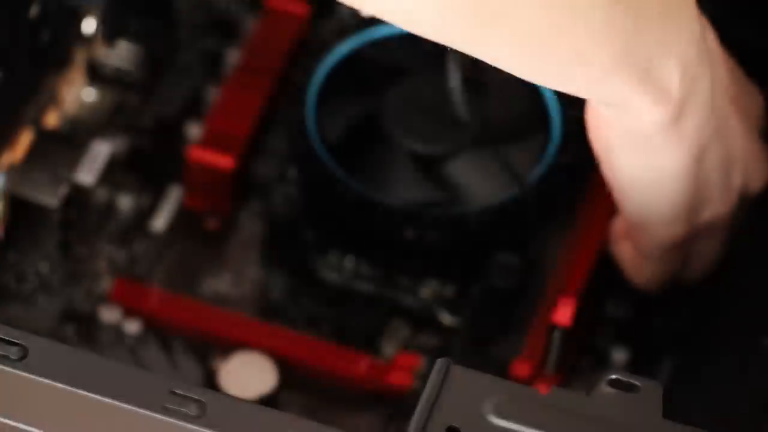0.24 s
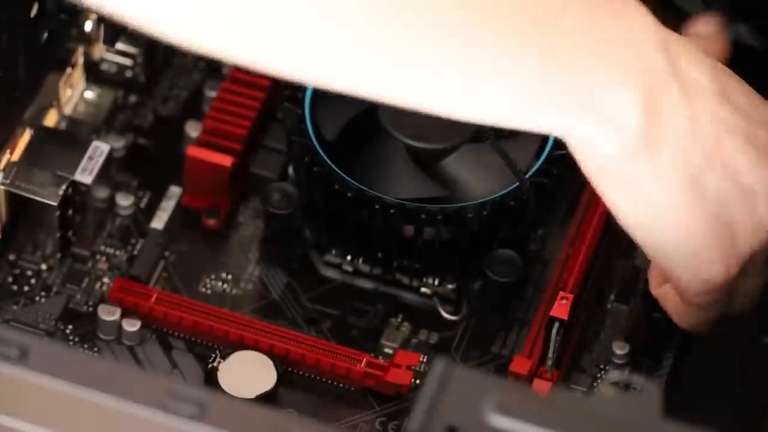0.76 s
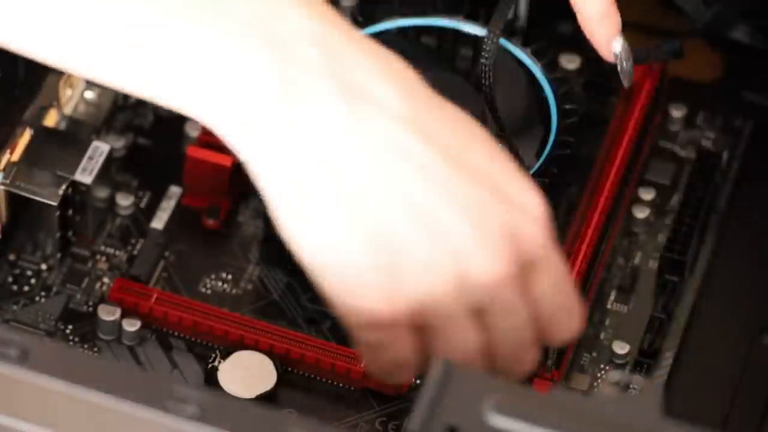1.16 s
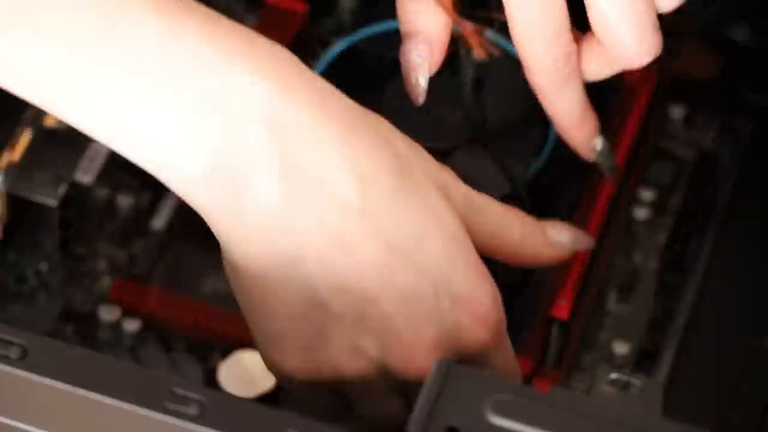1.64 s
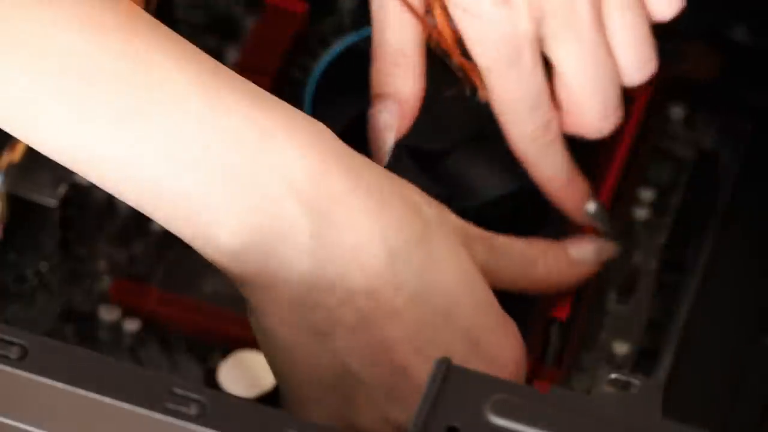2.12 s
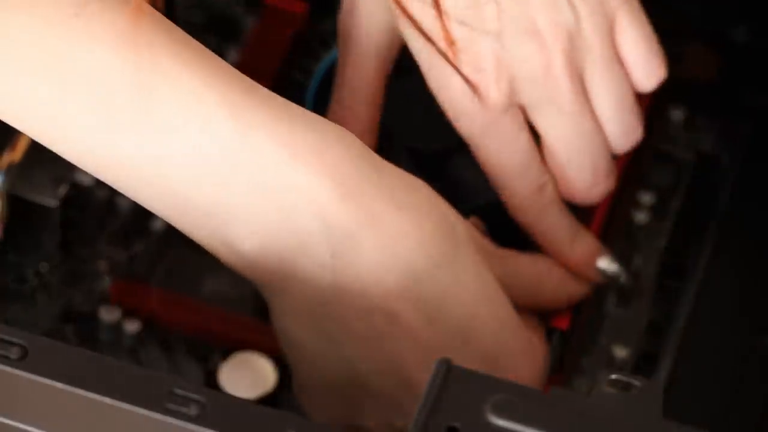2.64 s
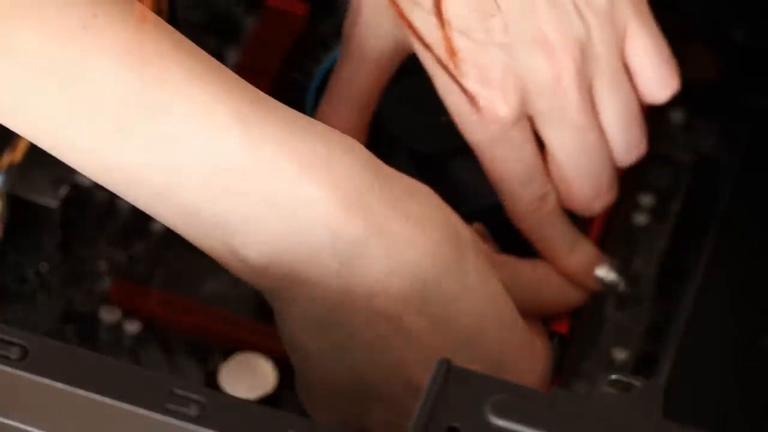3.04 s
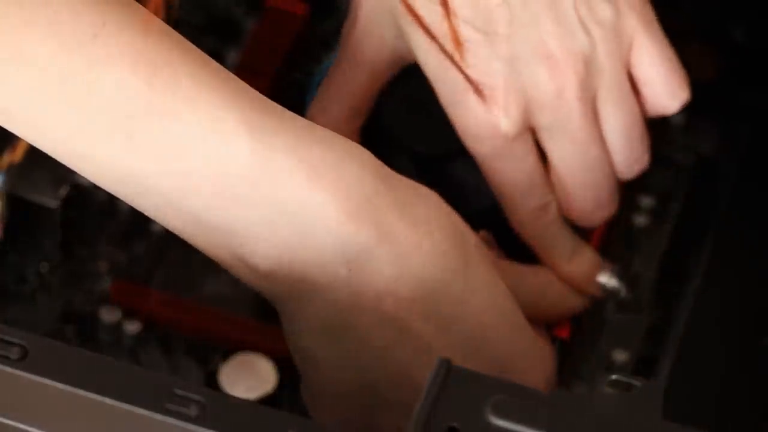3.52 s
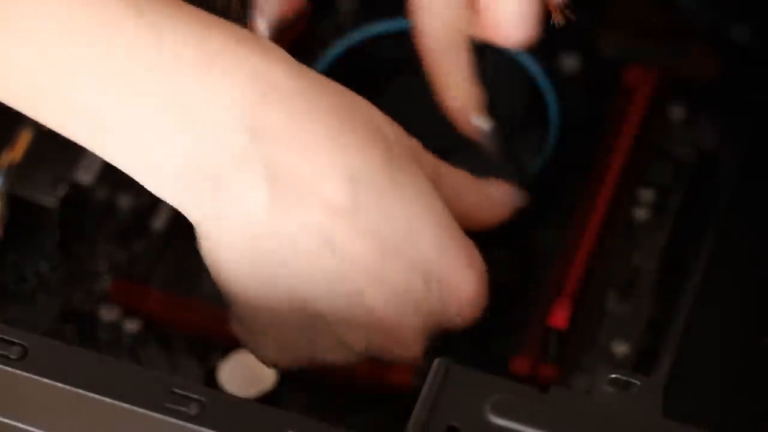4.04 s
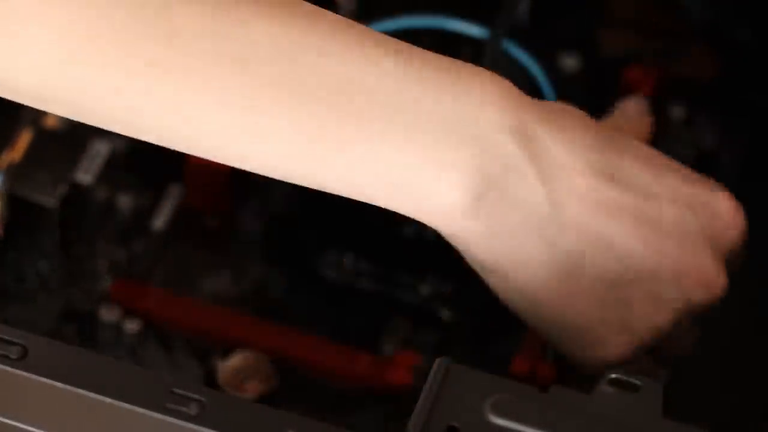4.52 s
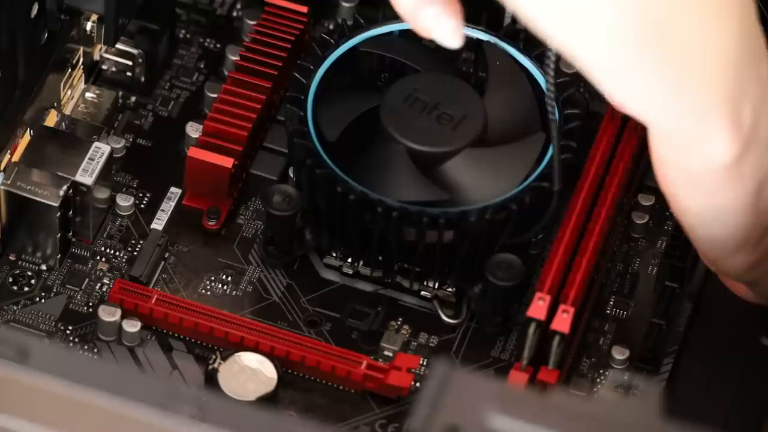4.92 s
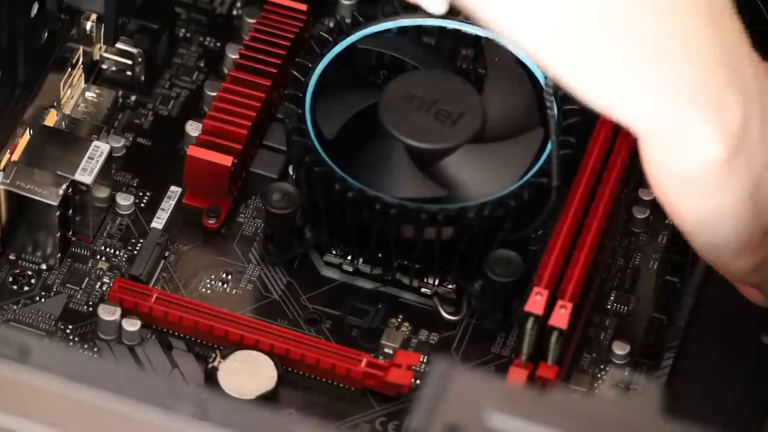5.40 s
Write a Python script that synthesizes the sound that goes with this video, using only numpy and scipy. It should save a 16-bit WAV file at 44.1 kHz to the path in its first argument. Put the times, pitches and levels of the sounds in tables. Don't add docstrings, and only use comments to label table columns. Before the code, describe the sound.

A close stereo take inside an open steel computer case in a small room, with low hum and soft microphone hiss throughout. At 0.25 s a plastic latch lifts with a short buzzy click and at 0.28 s cracks open brightly; little knocks rebound and board and panels ring away. A tiny lens motor tick comes at 0.76 s. Around 1.4-1.55 s fingers touch parts in a faint cluster of taps; at 1.8 s skin and sleeve brush softly, with another lens tick. A small creak sounds at 2.55 s. At 3.35 s contact springs slip with a light click, then at 3.52 s the stick seats and at 3.56 s the latch shuts, the loudest, hardest snap, with a brief metallic tail. A nail tap at 3.92 s and lens ticks from 4.04 to 4.76 s follow. A nail flicks at 5.06 s, rubbing continues softly, and dry edge taps and scraping close from 5.4 s.

```python
import sys
import numpy as np
from scipy import signal
from scipy.fft import rfft, irfft
from scipy.io import wavfile
from scipy.ndimage import uniform_filter1d

SR = 44100
rng = np.random.default_rng(int(sys.argv[2]) if len(sys.argv) > 2 else 0)


def volts_from_decibels(level):
    exponent = np.asarray(level, float) / 20
    return 10 ** exponent


def log_audio(samples):
    frames = np.atleast_2d(samples).T
    limited = np.clip(frames, -1, 1)
    pcm = np.round(limited * 32767).astype(np.int16)
    wavfile.write(sys.argv[1], SR, pcm)


N = 249606

# f/Hz, level/dB
LATCH_LIFT = [(410, -19), (700, -9), (2400, -6.5), (2880, 3.5), (3320, -6.5), (4610, -11.5), (6070, -26),
              (7890, -17), (12800, -27.5), (14600, -48), (16000, -43)], [(88, -51), (150, -2.5), (844, -2),
              (1160, -8), (1410, -4.5), (2540, -5), (5960, -23.5), (10300, -30), (14000, -40)]
LATCH_OPEN = [(530, -69), (900, -11), (2860, 1.5), (3820, -3.5), (4460, 1), (5960, 3), (7060, -3),
              (7770, 6.5), (8450, -4), (10200, -15), (11300, -31), (12600, -3), (16000, -50.5)], [(88, -34),
              (150, -26), (249, -7), (328, -4), (475, 0), (649, -6.5), (1140, -2.5), (2760, -13.5),
              (2980, -13), (6390, -9.5), (16000, -24)]
FIRST_SLIP = [(150, -55.5), (410, -35), (700, -17), (1000, 1), (1400, -11.5), (2050, -7.5), (3000, -19),
              (6500, -26), (12800, -41.5), (16000, -47)], [(59, -35.5), (100, -6.5), (527, 1.5), (853, -17),
              (943, -2.5), (1490, -4), (1650, -15.5), (1830, -5), (12000, -33.5), (15600, -75.5),
              (22000, -120)]
SEAT = [(100, -45.5), (330, -9.5), (650, -12.5), (960, 4.5), (1400, -4.5), (1960, -6.5), (4910, -26),
        (7210, -33), (8620, -44.5), (12700, -32), (16000, -47)], [(88, -59), (150, -24), (307, -4.5),
        (687, -4.5), (960, -9), (1850, -3), (2390, -16.5), (2720, -16.5), (3390, -20), (12000, -49),
        (15600, -79.5), (22000, -120)]
LATCH_SHUT = [(150, -59), (500, -34.5), (960, -2), (1350, -6), (1970, 1.5), (2990, -3.5), (3330, -4.5),
              (3500, -18), (4150, -19), (5540, -24), (6700, -28), (7790, -12.5), (10300, -29.5),
              (16000, -33.5)], [(88, -59.5), (150, -25.5), (341, -23), (702, -17), (960, -4.5), (1600, -5),
              (1870, 2), (2980, -2), (3330, -6), (3500, -15), (3840, -15), (5600, -15.5), (6700, -25),
              (8000, -19.5), (12700, -18.5), (16000, -26)]
NAIL_FLICK = [(470, -44), (850, -14), (1250, 3), (2070, -7.5), (3020, 3), (5380, -5), (7360, -1),
              (8990, -14), (12500, -12), (14300, -14), (16000, -26)], [(88, -31), (150, -27), (333, 5),
              (782, -13), (1440, 0.5), (2400, -6), (3500, -5), (4400, -8.5), (14000, -19.5)]
# f/Hz, level/dB, t60/s
PANEL_FAR = [(127.4, -14.5, 0.5), (212.6, -12, 0.44), (270.4, -5.5, 0.19), (360.3, -1.5, 0.2),
             (457, -3, 0.28), (496, -5.5, 0.5), (571, -3.5, 0.46), (596, -13, .3), (822, -8.5, 0.28),
             (942, -1.5, 0.16), (1065, -14, .15), (1171, -1, 0.24), (1397, -6.5, 0.3), (1516, -8.5, 0.28)]
# t/s, peak level/dB
LENS_STEPS = [(0.7624, -47.5), (1.8429, -44), (4.0418, -45), (4.162, -41), (4.282, -38), (4.483, -46.5),
              (4.6467, -54), (4.748, -50.5), (4.762, -38.5)]


def on_log(table, hz):
    f, v = np.transpose(table)
    return np.interp(np.log(np.maximum(hz, 1)), np.log(f), v)


def colour(x, table):
    cepstrum = irfft(np.log(volts_from_decibels(on_log(table, np.fft.rfftfreq(1024, 1 / SR)))))
    cepstrum[1:512] *= 2
    cepstrum[513:] = 0
    return signal.fftconvolve(x, irfft(np.exp(rfft(cepstrum))))[:len(x)]


def unit(x):
    return x / np.sqrt(np.mean(x ** 2))


def peak_one(x):
    return x / np.max(np.abs(x))


def ring(modes, length_s, rise_s):
    hz, db, t60 = np.transpose(modes)[:, :, None]
    t = np.arange(int(length_s * SR)) / SR
    chance = rng.standard_normal((2, len(modes), 1))
    strength = volts_from_decibels(db + 0.79 * chance[0])
    waves = np.sin(2 * np.pi * hz * t + 3 * chance[1])
    y = np.sum(strength * waves * 1000. ** (-t / t60), axis=0)
    return peak_one(y * (1 - np.exp(-t / rise_s)))


def tap(hz, octaves, decay_ms):
    t = np.arange(3000) / SR
    shape = [(hz / 4 ** octaves, -40), (hz / 2 ** (octaves / 2), -6), (hz, 0),
             (hz * 2 ** octaves, -9), (hz * 8 ** octaves, -30), (3 * hz * 8 ** octaves, -55)]
    force = rng.standard_normal(len(t)) + 2.95 * (t == 0)
    return peak_one(colour(force * np.exp(-1000 * t / decay_ms), shape))


def add(out, x, s, db, pan_db=0.):
    i = int(s * SR)
    x = x[:N - i]
    out[:, i:i + len(x)] += x * volts_from_decibels(db + np.array([[pan_db], [-pan_db]]) / 2)


def grit(rate, spread_db):
    happens = rng.random(N) < rate / SR
    force = rng.standard_normal(N)
    size_db = spread_db * np.minimum(rng.exponential(size=N), 4.5)
    return unit(happens * force * volts_from_decibels(size_db))


def strokes(rows):
    t = np.arange(N) / SR
    gain = 0
    for s, db, hold_s, rise, fade in rows:
        before, after = np.maximum(s - t, 0), np.maximum(t - s - hold_s, 0)
        gain = gain + volts_from_decibels(db - rise * before - fade * after)
    return uniform_filter1d(gain, size=300)


def pair(likeness, length):
    hz = np.fft.rfftfreq(length, 1 / SR)
    mid, side = rfft(rng.standard_normal((2, length)))
    alike = np.clip(on_log(likeness, hz), 0, 1)
    return hz, np.sqrt(1 + alike) * mid + np.sqrt(1 - alike) * side * np.array([[1], [-1]])


def floor():
    # f/Hz, level/dB
    hum_colour = [(15, -47), (31, -7.5), (53, 1), (135, -5), (172, -1), (252, -4.5), (280, -2.5), (358, -4),
                  (496, -2), (669, -6.5), (1510, -9.5), (2270, -11.5), (4020, -14), (14400, -26.5),
                  (16500, -31)]
    # f/Hz, likeness/0-1
    likeness = [(60, 0.68), (130, 0.7), (290, 0.4), (640, 0.44), (1410, 0.09), (3100, 0), (6820, 0),
                (15000, 0)]
    # f/Hz, level/dB
    balance = [(60, -2.5), (110, -1.5), (200, -4), (380, -3), (700, -2.5), (1290, -2.0), (2380, -3),
               (4400, -2.5), (8120, -2), (15000, -1.5)]
    hz, spectrum = pair(likeness, N)
    level_db = on_log(hum_colour, hz) + on_log(balance, hz) * np.array([[.5], [-.5]])
    sound = irfft(spectrum * volts_from_decibels(level_db), N)
    return sound * volts_from_decibels(-61) / np.std(sound.mean(axis=0))


def room(x):
    # f/Hz, t60/s
    air_t60 = [(125, 0.38), (350, 0.53), (700, 0.51), (1500, 0.34), (3000, 0.31), (5000, 0.22),
               (9000, 0.21), (15000, 0.15)]
    # f/Hz, likeness/0-1
    likeness = [(100, 0.6), (400, 1), (1000, 0.6), (2500, 0.3), (8000, 0)]
    t = np.arange(int(.7 * SR)) / SR
    hz, spectrum = pair(likeness, len(t))
    echo = 0
    for centre in 90 * 2 ** np.arange(0, 8, .5):
        share = np.clip(1 - 2 * np.abs(np.log2(hz / centre + 1e-9)), 0, 1)
        swell = 1 - np.exp(-t / (0.00047 + 2.0 / centre))
        echo = echo + irfft(spectrum * share, len(t)) * swell * 1000. ** (-t / on_log(air_t60, centre))
    early = 1 + 1.7 * np.exp(-t / 0.01)
    wet = signal.fftconvolve(x, echo * early * volts_from_decibels(-16.0), axes=1)[:, :N]
    return wet * volts_from_decibels(np.array([[-1.3], [1.3]]))


def lens_motor(out):
    # f/Hz, level/dB, t60/s
    plastic = [(1563, -1, 0.014), (2227, 0, 0.021), (2550, -10, 0.028), (3600, -10, 0.018),
               (4330, -8, 0.016), (5870, -4, 0.0039)]
    for s, db in LENS_STEPS:
        add(out, ring(plastic, .05, 0.00038), s, db)
        add(out, tap(2330, 0.89, 3.2), s, db - 5.5)


def lens_edges(out):
    for s, db in LENS_STEPS:
        add(out, tap(3700, 1.2, 2.5), s + 0.00102, db - 10)


def hands():
    # t/s, level/dB, hold/s, fade/(dB/s)
    rubs = [(1.416, -62, 0.061, 200), (1.49, -62, 0.04, 198), (1.78, -57, 0.034, 47),
            (2.57, -61.5, .015, 150), (2.757, -68.5, 0.036, 40), (2.993, -74, .02, 103),
            (3.37, -59, .005, 170), (3.746, -61, 0.016, 129), (3.954, -63, 0.045, 151),
            (4.16, -63, 0.018, 250), (4.948, -66.5, 0.11, 100), (5.07, -65, .006, 200),
            (5.188, -65.5, 0.22, 47), (5.399, -65.5, 0.097, 88)]
    # t/s, level/dB, hold/s
    leans = [(1.872, -73, 0.28), (2.582, -71.5, 0.15), (3.41, -51.5, 0.013), (3.722, -61, 0.029),
             (5.035, -59.5, 0.048), (5.447, -64, 0.17)]
    # t/s, level/dB, hold/s, rise/(dB/s), fade/(dB/s)
    sleeve = [
        (1.77, -65, 0.23, 59.6, 110),
    ]
    skin_colour = [(120, -22.5), (280, -7.5), (365, 0.5), (430, -4), (510, -4.5), (590, -5.5), (680, -7.5),
                   (900, -8.5), (2500, -21.5), (6000, -56.5)]
    cloth_colour = [(700, -1), (2000, 1.0), (4000, -1.0), (9000, -7.5), (16000, -49)]
    skin = unit(colour(grit(3000, 1.2), skin_colour))
    flex_band = signal.butter(2, [90, 210], "band", fs=SR, output="sos")
    flex = unit(signal.sosfilt(flex_band, rng.standard_normal(N)))
    cloth = unit(colour(rng.standard_normal(N), cloth_colour))
    sound = skin * strokes([(s, db, hold_s, 452, fade) for s, db, hold_s, fade in rubs])
    sound = sound + cloth * strokes(sleeve)
    return sound + flex * strokes([(*row, 150.5, 232) for row in leans])


def edge_creak():
    # f/Hz, level/dB
    creak_colour = [(290, -49), (500, -28), (586, -32), (960, 4), (1210, -23), (1320, -19), (2260, -3),
                    (2890, -10), (3700, -10.5), (7310, -13.5), (9490, -21), (13100, -19), (16000, -26.5)]
    # t/s, level/dB, hold/s, rise/(dB/s), fade/(dB/s)
    creaks = [
        (2.548, -53, 0.015, 550, 2200),
        (2.57, -66, 0.018, 2000, 400),
    ]
    return unit(colour(grit(5000, 0.6), creak_colour)) * strokes(creaks)


def strain():
    # t/s, level/dB, hold/s, rise/(dB/s)
    latch_rows = [
        (.247, -39, 0, 2000),
    ]
    spring_rows = [
        (3.353, -40, 0.00033, 3300),
        (3.482, -59, 0.033, 600),
        (3.519, -46.5, 0.0049, 1100),
    ]
    give = 20000
    springs = unit(colour(grit(4000, 1.4), FIRST_SLIP[0])) * strokes([(*row, give) for row in spring_rows])
    latch = unit(colour(grit(5400, 1.8), LATCH_LIFT[0])) * strokes([(*row, give) for row in latch_rows])
    return springs + latch


def edge_drag():
    # f/Hz, level/dB
    fast_colour = [(290, -57), (500, -21), (1190, -4), (1460, -12), (2010, -4), (2500, -5), (4200, -3.5),
                   (9490, -24), (13100, -45), (16000, -50)]
    slow_colour = [(240, -51), (400, -50), (553, 2.5), (655, -6.5), (1530, -6.5), (1930, -4), (2400, -13),
                   (2750, -4.5), (3990, -16), (16000, -30)]
    # t/s, level/dB, hold/s, rise/(dB/s), fade/(dB/s)
    drags = [
        (5.52, -50, 0.011, 1200, 900),
        (5.538, -45.5, 0.013, 600, 170),
    ]
    slips = grit(7000, 1.0)
    slowing = np.clip((np.arange(N) / SR - 5.525) / 0.062, 0, 1)
    fast, slow = unit(colour(slips, fast_colour)), unit(colour(slips, slow_colour))
    return ((1 - slowing) * fast + slowing * slow) * strokes(drags)


def nail_taps(out):
    # t/s, peak level/dB, f/Hz, width/octaves, decay/ms
    touches = [(0.545, -51, 2040, 0.54, 16), (0.631, -62, 328, 0.99, 13), (1.41, -56, 2900, .6, 9.),
               (1.42, -54, 550, 0.66, 23), (1.4805, -44, 2210, 0.33, 3.6), (1.481, -40.5, 1410, 0.37, 9.1),
               (1.48, -52.5, 3830, 0.21, 12), (1.468, -57, 520, 0.57, 5.), (1.524, -47, 710, 0.71, 5.3),
               (1.485, -45.5, 1290, 0.34, 9.9), (1.493, -49, 1630, 0.47, 23), (1.777, -48, 417, 0.53, 11),
               (2.582, -46.5, 4000, 1.5, 6.), (2.611, -56, 3800, .12, 3.), (3.833, -48.5, 5500, 1.5, 5.),
               (3.916, -37, 3100, 2.2, 7.4), (4.853, -51.5, 1021, 0.36, 5.1), (5.178, -46, 696, 0.93, 2.5),
               (5.4081, -47.5, 3020, 0.3, 2.7), (5.413, -46, 2000, 0.64, 13), (5.482, -42, 3600, 1.6, 5.2),
               (5.519, -39.5, 4030, 0.38, 7.1), (5.539, -39.5, 1980, 0.24, 9),
               (5.575, -47, 2760, 0.34, 5.5)]
    for s, db, hz, octaves, decay_ms in touches:
        add(out, tap(hz, octaves, decay_ms), s, db)
        panel_db = -15 - 3.5 * np.log2(hz / 1000)
        add(out, ring(PANEL_FAR, 0.45, 0.0031), s, db + panel_db)


def more_taps(out):
    # t/s, peak level/dB, f/Hz, width/octaves, decay/ms
    glances = [(1.44, -59, 1150, .3, 4.), (1.535, -53, 1450, .4, 8.), (4.7465, -45.5, 3700, 0.76, 4.),
               (4.4, -45, 2000, .3, 3.), (4.853, -55, 3450, 0.37, 1.5), (5.483, -47, 2700, .35, 4.8),
               (5.527, -45, 3800, .4, 8.), (5.547, -41, 2730, 0.22, 10.), (1.4795, -46, 1400, .5, 2.),
               (1.495, -54, 2000, .4, 8.), (1.51, -52, 700, .3, 9.), (5.069, -44.5, 370, .5, 12.),
               (5.076, -46, 1900, .8, 2.), (5.5415, -42, 2300, 1.1, 1.), (5.5785, -45, 2800, .9, 1.),
               (5.5195, -43, 2700, 1.1, 1.), (5.56, -48, 870, .7, 9.), (5.4095, -47, 3200, 0.87, 1.5),
               (.762, -54, 2300, .8, 1.5), (.2763, -16.5, 7660, .3, 1.5), (3.353, -35.5, 2140, 0.27, 3.5),
               (5.528, -52, 6500, .8, 6.), (5.546, -52, 7000, .8, 4.)]
    for s, db, hz, octaves, decay_ms in glances:
        add(out, tap(hz, octaves, decay_ms), s, db)


def loose_parts(out):
    # t/s, peak level/dB, f/Hz, t60/s
    rings = [(.2505, -30, 2500, .025), (.29, -31, 1170, .16), (.33, -39, 1370, .12),
             (1.424, -53.5, 680, .12), (1.49, -51, 1900, .06), (1.5, -51.5, 1450, .1),
             (2.5575, -49, 2200, .03), (2.541, -55, 1000, .06), (2.558, -51.5, 3900, .025),
             (3.357, -37.5, 972, .09), (3.556, -20, 3270, .025), (3.557, -18, 2350, .03),
             (5.066, -53, 2000, .2), (5.064, -40.5, 1150, .04), (5.094, -54, 3450, .04),
             (.36, -44, 1520, 0.092), (.31, -48, 1850, .15), (3.575, -32, 1930, .14),
             (3.585, -39, 2750, .1), (3.6, -38, 1000, .12), (3.509, -44, 960, .1)]
    for s, db, hz, t60 in rings:
        add(out, ring([(hz, 0, t60), (1.013 * hz, -7, t60)], .3, .0012), s, db)


def side_panel(out):
    # t/s, peak level/dB, f/Hz, t60/s
    hums = [
        (.277, -41.5, 364, .9),
        (.277, -53, 352, .7),
        (.278, -45, 133, .5),
        (3.557, -42, 343, .7),
        (3.557, -50, 362, .6),
    ]
    for s, db, hz, t60 in hums:
        add(out, ring([(hz, 0, t60)], 0.89, 0.011), s, db)


def rebounds(out):
    # t/s, peak level/dB, f/Hz, width/octaves, decay/ms
    knocks = [(.2545, -33, 2400, 0.55, 1.2), (.2575, -28, 750, 1, 1.7), (.2775, -19, 2700, 0.7, 1.8),
              (0.282, -14, 5000, 2.2, 1.3), (.2852, -27, 900, 1.1, 1.5), (0.2923, -22, 5500, 1.0, 3.8),
              (0.2997, -23, 1100, 0.9, 3.9), (3.526, -37, 1000, .5, 1.6), (3.5345, -21, 850, 0.58, 1.8),
              (3.529, -30, 405, 0.43, 12), (3.533, -28, 633, 0.22, 7.7), (3.561, -14.5, 2600, 0.5, 1.3),
              (3.5695, -22, 2000, 0.31, 2.2), (3.5774, -24, 2300, .7, 1.8), (5.064, -39, 1420, .4, 2.4),
              (5.0747, -42, 2670, 0.43, 2.3), (5.1, -48, 1500, .4, 5.)]
    for s, db, hz, octaves, decay_ms in knocks:
        add(out, tap(hz, octaves, decay_ms), s, db)


def snaps(direct, send):
    # t/s, peak level/dB, left minus right/dB, panel ring/dB, echo/dB
    events = [
        (0.2467, -18.5, 1.5, -5.5, -22),
        (0.275, -7.5, 2.5, -17, -14),
        (3.3507, -23, -0.5, -15.5, -30),
        (3.5199, -9.5, -1, -20, -14),
        (3.555, -2.5, -1.5, -22.5, -11.5),
        (5.0587, -22.5, 1.5, -24, -31),
    ]
    # rate/(slips/s), roughness/0-1, rise/ms
    chatter = [
        (935, .35, 1.2),
        (700, .85, .4),
        (975, .4, 1.1),
        (953, .3, 1.0),
        (970, .2, .6),
        (410, .85, .25),
    ]
    # decay/ms, first crack of plastic against the burst/dB, crack decay/ms
    bursts = [
        (3, -19, 1.2),
        (2.3, -4, 1.197),
        (6.2, -31, 1.1),
        (2.4, -31.5, 3.),
        (2.5, -4, 1.6),
        (2.6, -5.5, 1.2),
    ]
    # f/Hz, level/dB, t60/s
    panel_near = [(131, -24, 1), (160.6, -15.5, 0.29), (224.3, -6, 0.074), (348, -13.5, 0.18),
                  (443, -7.5, 0.31), (548, -8.5, 0.42), (884, -1.5, 0.32), (930, -4, 0.12), (1410, -9, 0.2),
                  (1781, -7, 0.16), (2000, -5.5, 0.14), (2210, -9.5, .22), (2600, -14, 0.13),
                  (2920, -7.5, 0.26)]
    colours = [LATCH_LIFT, LATCH_OPEN, FIRST_SLIP, SEAT, LATCH_SHUT, NAIL_FLICK]
    t = np.arange(4096) / SR
    for event, slipping, (near, far), shape in zip(events, chatter, colours, bursts):
        s, db, pan_db, panel_db, echo_db = event
        rate, rough, rise_ms = slipping
        decay_ms, crack_db, crack_ms = shape
        noise = rng.standard_normal(len(t))
        count = np.floor(rate * t + .006 * np.cumsum(noise))
        slips = unit(np.diff(count, prepend=-1))
        force = np.sqrt(1 - rough) * slips + np.sqrt(rough) * noise
        swell = (1 - np.exp(-1000 * t / rise_ms)) ** 2
        burst = colour(force * swell * np.exp(-1000 * t / decay_ms), near)
        add(direct, peak_one(burst), s, db, pan_db)
        panel = PANEL_FAR if s < 1 else panel_near
        add(direct, ring(panel, 0.93, 0.0034), s + 0.00202, db + panel_db)
        add(direct, tap(12300, 0.8, crack_ms), s + rise_ms / 1000, db + crack_db, pan_db)
        blow = colour(1. * (t == 0), far)
        add(send, blow / np.linalg.norm(blow), s + .002, echo_db)


def ports(x):
    # f/Hz, level/dB
    balance = [(60, 9), (110, -2), (200, -1.5), (380, -2.5), (700, -2.5), (1290, -3), (2380, -9),
               (4400, -4.5), (8120, -2), (15000, -6)]
    # f/Hz, phase/rad
    lead = [(1000, 0), (3000, .3), (6000, .8), (8000, 1.2), (16000, 1.2)]
    hz = np.fft.rfftfreq(N, 1 / SR)
    half = volts_from_decibels(on_log(balance, hz) / 2) * np.exp(.5j * on_log(lead, hz))
    return irfft(rfft(x) * np.array([half, 1 / half]), N)


def scene():
    direct, send, small = np.zeros((3, 2, N))
    snaps(direct, send)
    rebounds(direct)
    lens_motor(small)
    nail_taps(small)
    small = small + hands() + edge_creak() + strain() + edge_drag()
    around = room(send + volts_from_decibels(-25.0) * small) + floor()
    side_panel(direct)
    loose_parts(direct)
    more_taps(direct)
    lens_edges(direct)
    return ports(direct + small) + around


def low_pass(x):
    return signal.sosfilt(signal.butter(12, 17160, fs=SR, output="sos"), x)


def record(dry):
    rounded = 1.03 * np.tanh(dry / 1.03)
    top_cut = signal.ellip(10, .2, 90, 16350, fs=SR, output="sos")
    return low_pass(signal.sosfilt(top_cut, rounded))


dry = scene()
out = record(dry)
log_audio(out)
```